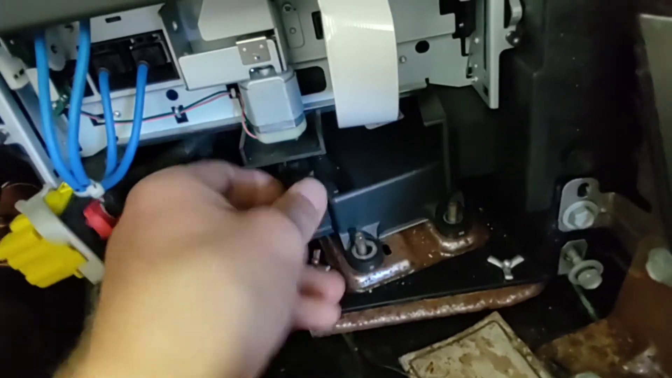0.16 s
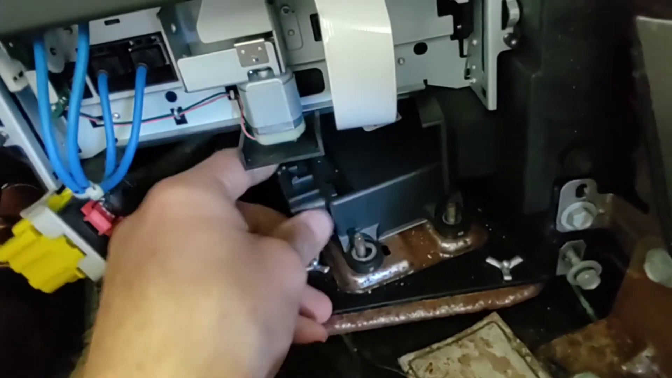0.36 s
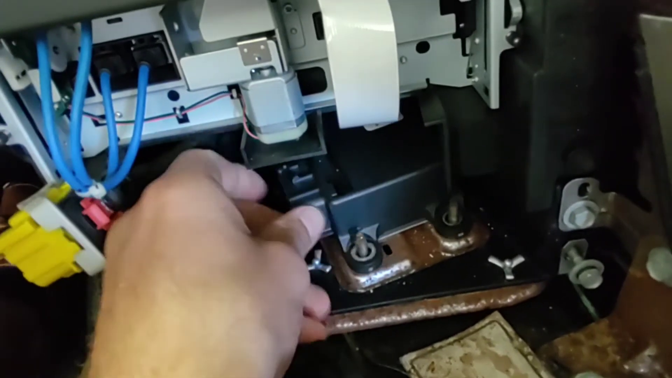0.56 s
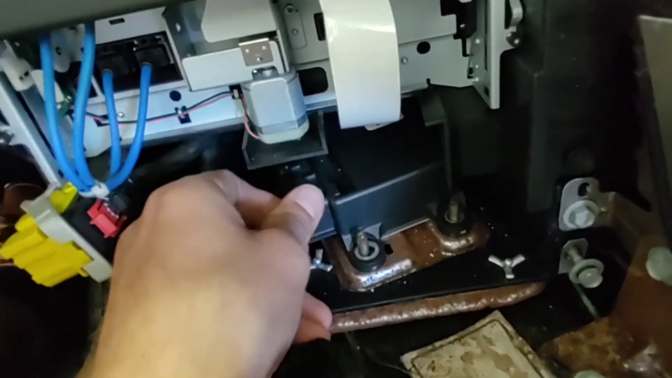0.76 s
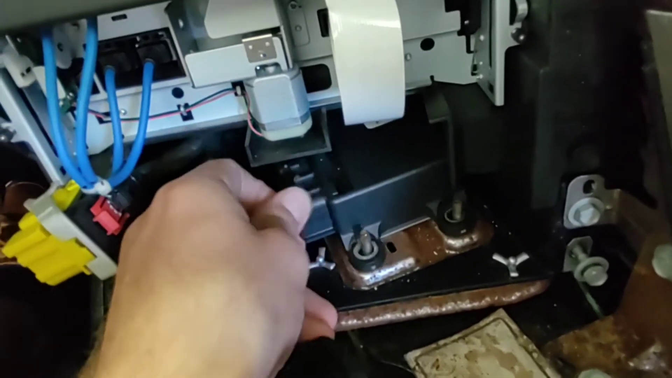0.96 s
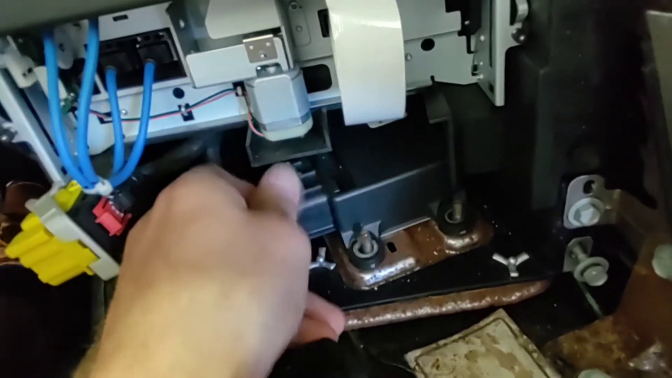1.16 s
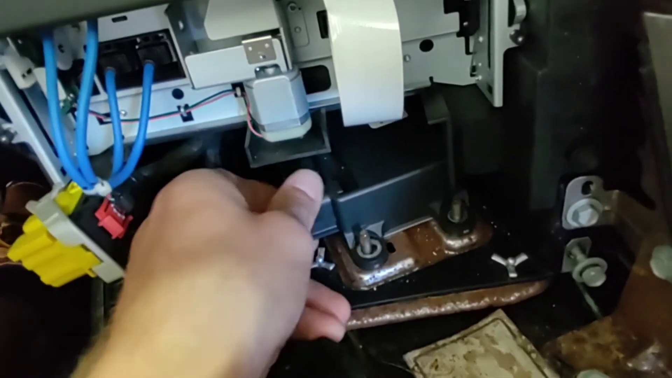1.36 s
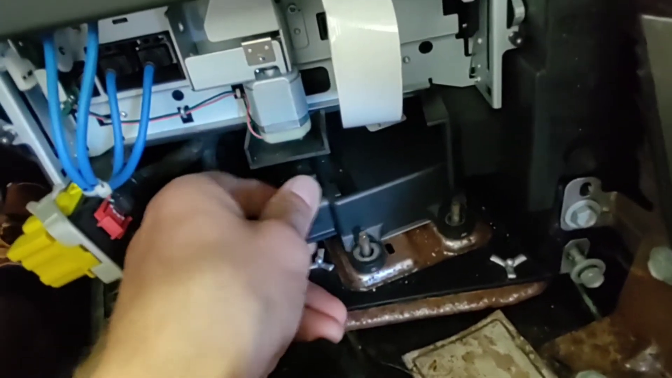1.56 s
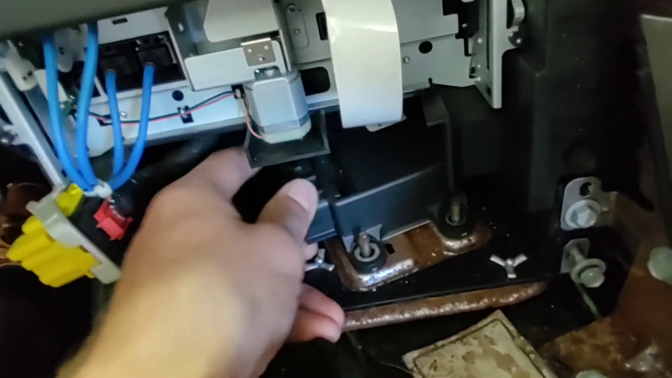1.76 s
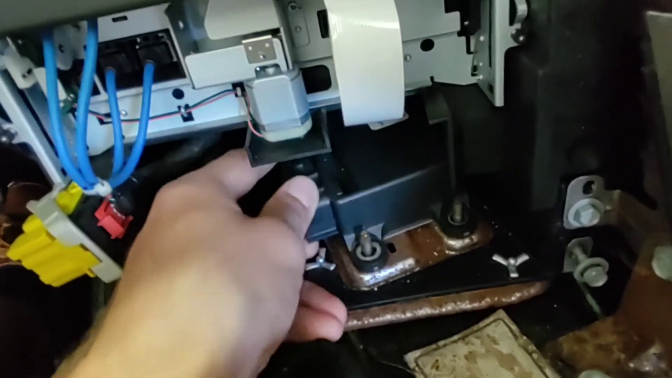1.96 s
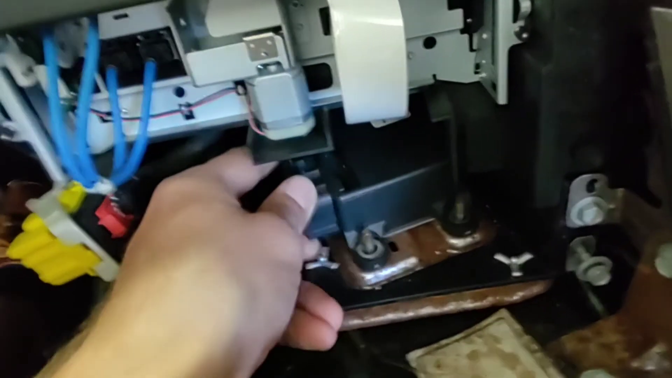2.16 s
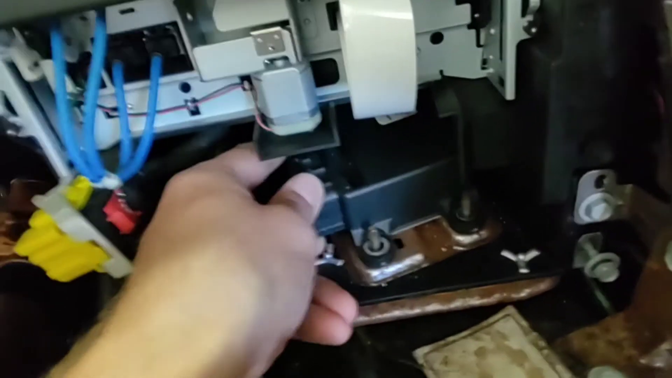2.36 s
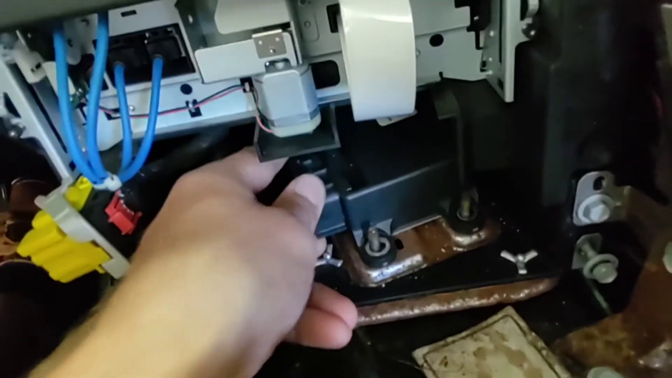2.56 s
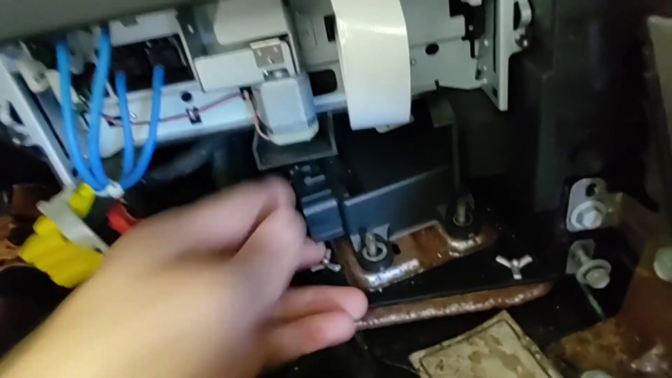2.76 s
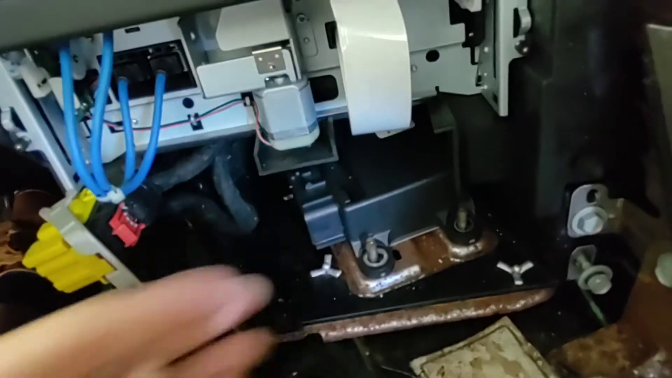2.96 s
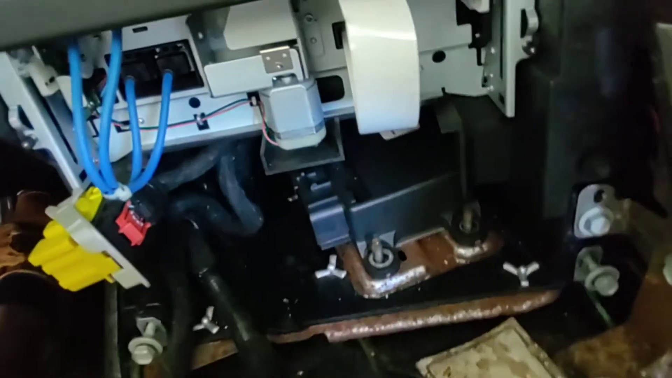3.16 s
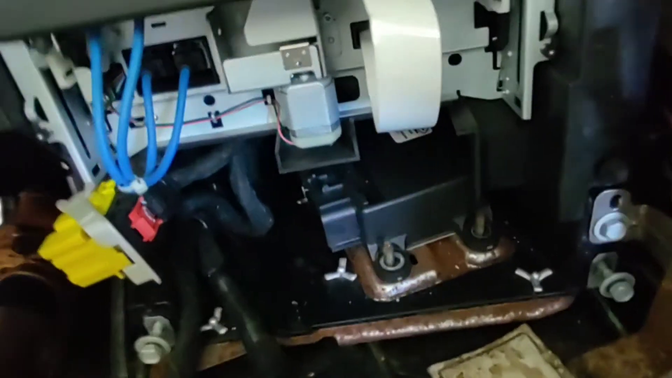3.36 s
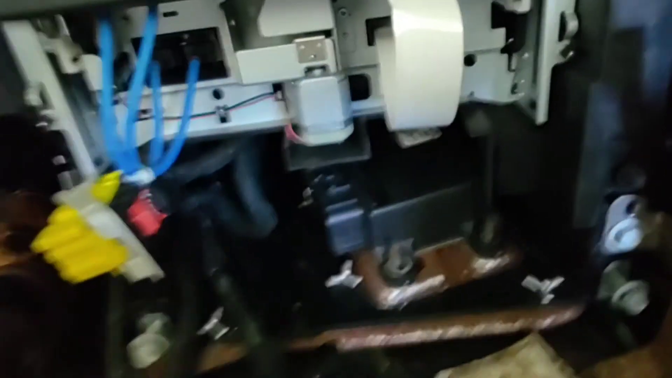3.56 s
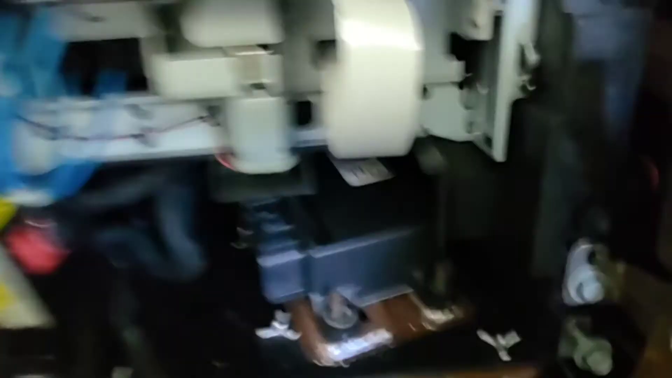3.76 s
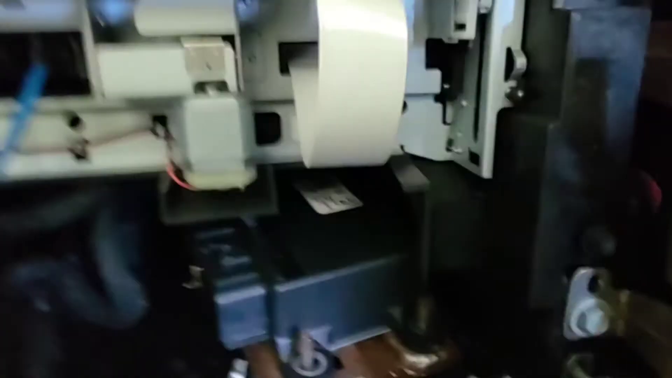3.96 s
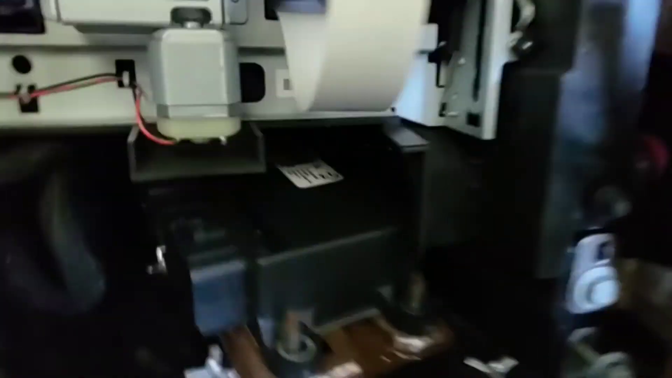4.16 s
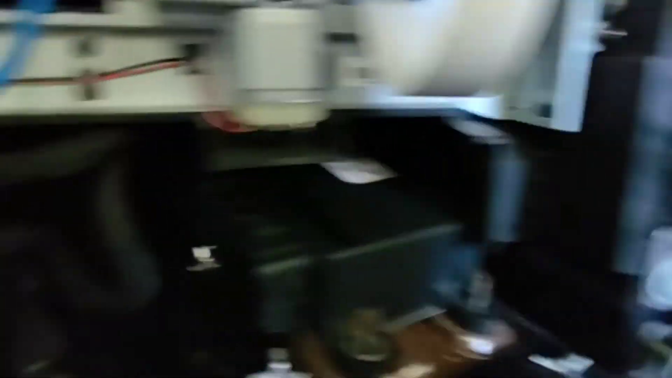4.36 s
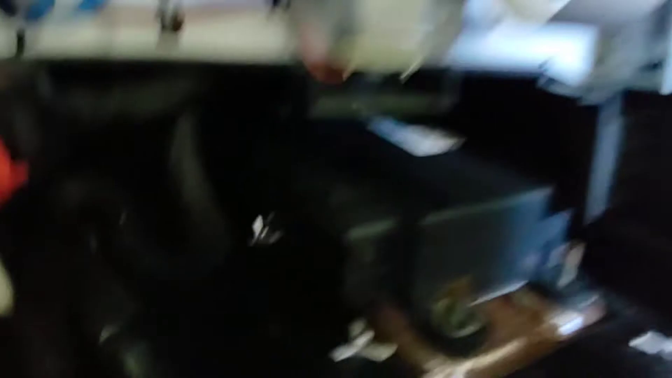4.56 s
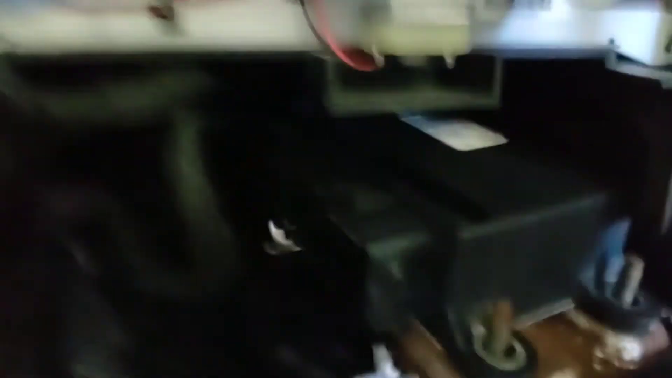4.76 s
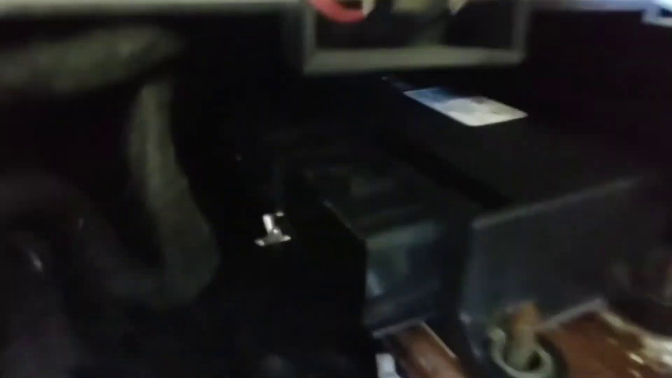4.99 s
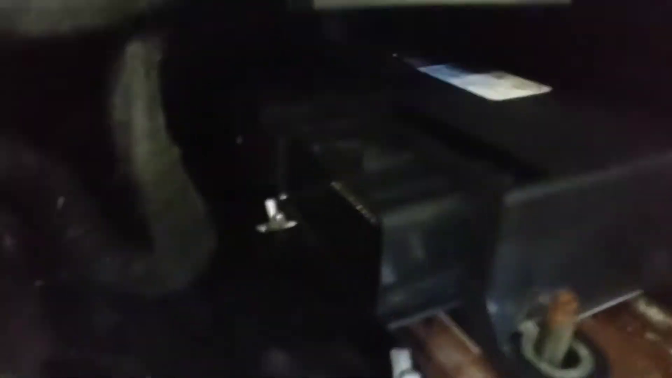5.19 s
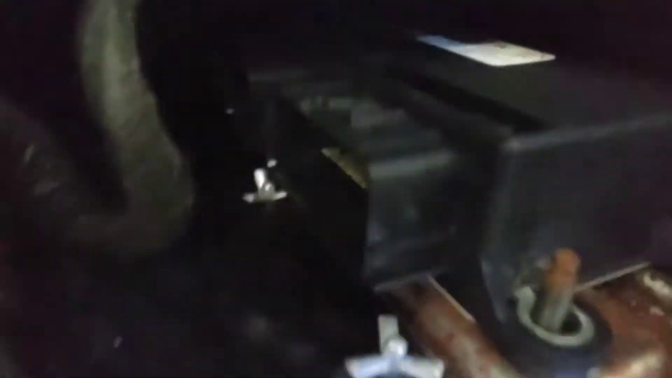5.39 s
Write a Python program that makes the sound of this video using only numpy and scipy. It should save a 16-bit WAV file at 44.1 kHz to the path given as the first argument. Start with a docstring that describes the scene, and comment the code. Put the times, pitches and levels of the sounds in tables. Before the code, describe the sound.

Irregular clacks and scrapes of plastic on metal, bunching into a fast rattle, give way to faint hiss and sharp taps on the camera.

```python
"""Module wiggled under a dashboard

A hand wiggles a plastic electronic module on its steel bracket, close to a handheld camera, in a dead, carpeted
footwell. Knocks are shaped noise plus ringing modes; scrapes are stick-slip grains; squeaks are narrow resonances.
Then the arm slides away with a soft hiss of filtered noise, and fingers bump and tick on the camera's body,
mostly at its right microphone port: short noise bursts, damped pushes and grainy crackle over a low, steady noise."""
import sys
import numpy as np
from scipy import signal
from scipy.fft import rfft, irfft
from scipy.io import wavfile

SR = 44100
rng = np.random.default_rng(int(sys.argv[2]) if len(sys.argv) > 2 else 0)


def int16_out(signal):
    """Quantize to a 16-bit WAV file."""
    q = np.round(np.clip(np.atleast_2d(signal).T, -1, 1) * 32767)
    wavfile.write(sys.argv[1], SR, q.astype(np.int16))


N = 239286

# Housing against bracket. Each row: start in seconds, strength in dB, hardness of the contact in dB,
# hollow clack of the shell in dB.
KNOCK_ROWS = [(0.0, -22.5, 2, 0), (0.0185, -16.5, -0.5, -2), (0.0554, -28, 0.5, 1), (0.2644, -47, 2.5, 0.5),
              (0.2988, -41, 6, -11), (0.3314, -38, -3, 4), (0.5148, -40.5, -1.5, 4.5),
              (0.6275, -50, -4.5, -3.5), (0.7441, -26.5, 5.5, -3), (0.9675, -51, -0.5, -3),
              (1.029, -15.5, 1, -8), (1.139, -40.5, -5, 6), (1.1746, -28.5, 0, 2), (1.229, -21.5, 1, -4),
              (1.247, -32.5, -.5, -1), (1.3079, -19, -1.5, -0.5), (1.318, -25.5, -2.5, 2),
              (1.3254, -30, 3, 1), (1.3979, -30.5, .5, 7.5), (1.4384, -21.5, 1, -2),
              (1.5541, -35.5, -7, 10), (1.5715, -25, -.5, -2), (1.673, -35.5, -3, 1), (1.714, -53, -5.5, 0),
              (1.8093, -25, 3, 0.5), (1.9131, -37.5, 1, 0.5), (2.0661, -27, 2.5, 2.5),
              (2.1314, -19.5, 3.5, 3.5), (2.1808, -33, -5.5, -3.5), (2.1965, -29, -2.5, -3.5),
              (2.2053, -20.5, 4, 1), (2.2218, -23, -3, 2), (2.2386, -20.5, -1, -8), (2.2695, -24, -6, 5.5),
              (2.287, -24, -6, -4), (2.3096, -21, 6.5, 1.5), (2.3195, -34.5, 10, -1.5),
              (2.3469, -19.5, 0.5, -2.5), (2.6621, -52.5, 6.5, -3), (2.7374, -54.5, -0.5, 4),
              (2.7896, -59.5, 0.5, -17.5), (2.8368, -66, 9, 9.5), (2.8962, -61, -2.5, -3)]
# Colour of a usual knock. Each entry: one band's level in dB, bass to treble.
KNOCK_COLOUR_DB = [-14, 0.5, -1.08, 1.2, -8.5]
# Growth with force, hardness and clack. Each row: one of these; columns: bass to treble in dB per dB.
KNOCK_GROWTH_DB_PER_DB = [(.42, 0.81, 1.04, 0.97, .94), (-1.1, -.8, 0.11, .7, 1),
                          (-0.5, -0.094, 1.1, 0.22, -.3)]
USUAL_KNOCK_DB = -30
KNOCK_T60_S = 0.035  # longest ring of the crack
FIRM_KNOCK_DB, PRESS_DAMPING_DB_PER_DB = -22, 0.35  # the crack shortens above this strength


def knock(start_s, strength_db, hardness_db, clack_db):
    """The housing hits the bracket: the thud grows slower than the crack, a firm press damps the crack."""
    force_db = strength_db - USUAL_KNOCK_DB
    growth_db = np.dot([force_db, hardness_db, clack_db], KNOCK_GROWTH_DB_PER_DB)
    levels_db = USUAL_KNOCK_DB + np.add(KNOCK_COLOUR_DB, growth_db)
    excess_db = max(strength_db - FIRM_KNOCK_DB, 0)
    t60_s = KNOCK_T60_S * amp(-PRESS_DAMPING_DB_PER_DB * excess_db)
    return start_s, blow(levels_db, contact_pan(start_s), t60_s, modes_db=0.5, tail_db=0, snap_db=-11.0,
                         rise_s=0.0013, dull_hz=8900)


# Place of contact as the module rocks. Each row: time in seconds, left-right in dB.
CONTACT_PAN_ROWS = [(.05, -4.5), (.27, 0.5), (1.45, 0), (2.07, -2), (2.22, 6), (2.285, 5.5), (2.31, 5),
                    (2.39, 5), (2.55, 0.5)]


def contact_pan(time_s):
    """Left-right dB of the place where the housing touches at that moment."""
    return np.interp(time_s, *np.transpose(CONTACT_PAN_ROWS))


# Shading between the ports. Each entry: one band's left-right in dB, bass to treble.
PORT_PAN_DB = [2, -0.5, 0, -5.5, -7]
# Correlation of the noise at the ports. Each entry: one band's likeness from 0 to 1, bass to treble.
PORT_CORRELATION = [1, .88, 0.24, 0.067, 0.077]
# Tail of dashboard and footwell. Each entry: one band's t60 in seconds, bass to treble.
TAIL_T60_S = [0.25, 0.11, 0.1, .13, 0.082]
# Start of that tail relative to the crack, before the blow's own offset. Each entry: one band in dB.
TAIL_START_DB = [-9.5, -12, -5.5, -18.5, -25]
USUAL_BOUNCE_S, BOUNCE_DB = .0026, -7.5  # rebound; its delay varies from half to one and a half


def blow(levels_db, pan_db, t60_s, modes_db, tail_db, snap_db, rise_s, dull_hz):
    """A contact: a snap with one rebound, a dense crack, the housing's modes and a tail, weighted by band."""
    t = np.arange(SR // 4) / SR
    head = slice(0, round(.012 * SR))  # sets the level
    rise = 1 - np.exp(-(t / rise_s) ** 2)  # the edges take a moment to bite
    ring = housing(t, damping=1.9) * rise
    snap = signal.unit_impulse(len(t), int(np.searchsorted(t, rise_s)))  # then meet squarely
    bounce_s = USUAL_BOUNCE_S * (.5 + rng.random())
    snap[np.searchsorted(t, rise_s + bounce_s)] += amp(BOUNCE_DB)
    out = np.zeros((2, len(t)))
    for k, level_db in enumerate(levels_db):
        tail = amp(TAIL_START_DB[k] + tail_db - 60 * t / TAIL_T60_S[k])
        fade = amp(-60 * t / t60_s) + tail
        noise = pair(len(t), PORT_CORRELATION[k])
        crack = dulled(band(noise * fade * rise, k), dull_hz)
        click = dulled(band(snap, k), dull_hz)
        part = unit(crack) + amp(snap_db) * unit(click) + amp(modes_db) * unit(band(ring, k))
        part /= part[:, head].std(axis=1, keepdims=True)
        out += amp(level_db) * panned(pan_db + PORT_PAN_DB[k]) * part
    return out


# Modes of housing and bracket. Each row: mean frequency in Hz, median level in dB,
# t60 in seconds at damping 1, left-right in dB.
HOUSING_MODES = [(198, -14, 0.096, 0), (277.7, -0.5, 0.19, -3), (407, -18, 0.092, 5), (525.7, 0, 0.15, 6.5),
                 (574, 8, 0.086, -6.5), (824, -4.5, 0.16, 11), (860, 0.5, 0.088, -2.5),
                 (1206, 2.5, 0.12, -5), (1452, -1, 0.067, -4.5), (1576, -11, 0.18, 13),
                 (2110, -24, 0.056, -6), (2365, 3.5, 0.1, 3), (2740, 9.5, 0.015, -5),
                 (3165, 6, 0.075, -6.5), (3465, 6, 0.03, -14), (3720, -17.5, 0.023, -3),
                 (5415, -5.5, 0.071, -1.5), (6925, -1, 0.061, 3.5), (7450, -3.5, 0.029, 17.5)]


def housing(t, damping):
    """The modes ring, each as strongly as the point of contact happens to move it."""
    out = np.zeros((2, len(t)))
    for hz, level_db, t60_s, pan_db in HOUSING_MODES:
        strength, detune, skew = rng.standard_normal(3)
        port_skew = np.array([[0], [skew * hz / 1500]])  # high modes reach the ports out of step
        phase = 2 * np.pi * rng.random() + port_skew
        mode_hz = hz * (1 + 0.043 * detune)  # the hand's pressure shifts the pitch
        swing = np.sin(2 * np.pi * mode_hz * t + phase)
        decay = amp(level_db + 4.1 * strength - 60 * t * damping / t60_s)
        out += panned(pan_db) * decay * swing
    return out


SKID_AHEAD_S, SKID_LENGTH_S, USUAL_SKID_DB, SKID_HARDNESS_DB = 0.0074, .02, -54, 2
SKID_DB_PER_FORCE_DB, SKID_DB_PER_HARDNESS_DB = .5, .3


def lead_in(start_s, strength_db, hardness_db, clack_db):
    """Before it strikes, the housing skids briefly along the bracket, harder before a harder knock."""
    skid_db = USUAL_SKID_DB + SKID_DB_PER_FORCE_DB * (strength_db - USUAL_KNOCK_DB)
    skid_db += SKID_DB_PER_HARDNESS_DB * hardness_db
    return scuff(start_s - SKID_AHEAD_S, SKID_LENGTH_S, skid_db, SKID_HARDNESS_DB)


# Short slips of one surface on another. Each row: centre in seconds, nominal length in seconds,
# strength in dB, hardness in dB.
SCUFF_ROWS = [(0.035, .026, -33.5, -5), (0.24, 0.038, -55.5, -2.5), (0.303, 0.071, -51, -8),
              (0.392, 0.1, -63.5, 11), (0.499, 0.024, -58.5, 4), (0.599, 0.015, -53, 11.5),
              (0.66, 0.013, -66, 13), (1.164, .025, -48.5, -1.5), (1.376, 0.022, -41, -2),
              (1.516, 0.065, -51.5, 0.5), (1.945, 0.029, -44.5, -0.5), (2.031, 0.036, -38, -2.5),
              (2.147, 0.023, -35, -3), (2.265, 0.03, -33, -4), (2.376, 0.043, -40, -3),
              (2.567, 0.036, -50.5, -2.5)]
# Colour of a usual scuff. Each entry: one band's level in dB, bass to treble.
SCUFF_COLOUR_DB = [-12.5, 1.2, -0.2, 1.5, 3.1]
# Growth with hardness. Each entry: one band in dB per dB, bass to treble.
SCUFF_GROWTH_DB_PER_DB = [-1.2, -1, 0.14, .5, 1]


def scuff(centre_s, length_s, strength_db, hardness_db):
    """A swell of stick-slip grains that shakes the housing."""
    growth_db = np.multiply(hardness_db, SCUFF_GROWTH_DB_PER_DB)
    levels_db = strength_db + np.add(SCUFF_COLOUR_DB, growth_db)
    pan_db = contact_pan(centre_s)
    t = np.arange(round((2 * length_s + 0.052) * SR)) / SR
    swell = np.exp(-2 * ((t - length_s) / length_s * 1.51) ** 2)
    stroke = grains(len(t), per_s=2800, spread_db=5.5) * swell
    ring = housing(t, damping=4.5)
    middle = slice(round(length_s * SR * 3 / 4), round(length_s * SR * 5 / 4))  # sets the level
    out = np.zeros((2, len(t)))
    for k, level_db in enumerate(levels_db):
        noise = pair(len(t), PORT_CORRELATION[k]) * amp(-60 * t / 0.044)
        body = unit(band(noise, k)) + amp(-2) * unit(band(ring, k))
        part = signal.fftconvolve(stroke[None], body, axes=1)[:, :len(t)]
        out += amp(level_db) * panned(pan_db + PORT_PAN_DB[k]) * part / part[:, middle].std()
    return centre_s - length_s, dulled(out, hz=7800)


# An edge dragging on the bracket. Each row: centre in seconds, half-length to 1/e in seconds,
# gain in dB, pitch as a multiple of the resonances below.
SQUEAK_ROWS = [(0.597, 0.007, -46, 1), (0.61, 0.012, -45, .92), (0.888, 0.016, -72, 1),
               (1.063, 0.011, -40.5, 1), (2.663, 0.0057, -58, 1), (3.687, 0.0033, -68.5, 1.06)]
# Resonances at pitch 1. Each row: frequency in Hz, width of one filter pass in Hz, level in dB.
SQUEAK_RESONANCES = [(3213, 170, 6), (6860, 1490, -4.5), (8200, 1200, -4)]


def squeak(centre_s, half_length_s, gain_db, pitch):
    """A brief drag that sings in the bracket's narrow resonances."""
    t = np.arange(-SR // 10, SR // 10) / SR
    drag = pair(len(t), 1.0)
    ring = np.zeros_like(drag)
    for hz, width_hz, mode_db in SQUEAK_RESONANCES:
        b, a = signal.iirpeak(hz * pitch, hz / width_hz, SR)
        once = signal.lfilter(b, a, drag)
        ring += amp(mode_db) * unit(signal.lfilter(b, a, once))
    swell = np.exp(-(t / half_length_s) ** 2)
    return centre_s + t[0], amp(gain_db) * panned(-9.5) * ring * swell


# Pushes of the hand that make the parts rub. Each row: start in seconds, length in seconds, level in dB.
RUB_STROKES = [(0.02, 0.06, -42), (.26, 0.12, -50), (.56, 0.26, -60), (1.02, 0.11, -52.5),
               (1.22, 0.1, -46.5), (1.42, 0.12, -47.5), (1.72, .26, -61.5), (2.09, 0.34, -45),
               (2.2, 0.053, -37), (2.66, 0.38, -65)]
# Spectrum of the rub. Each row: frequency in Hz, relative level in dB.
RUB_SPECTRUM = [(30, -28), (70, -7), (150, 1.5), (300, 0), (550, -1), (1100, -6), (1900, -12), (2400, -8),
                (3200, -8), (4700, -21), (7000, -23), (12000, -42)]


def rubbing():
    """Low, grainy friction of the hand and the parts between the knocks."""
    friction = pair(N, 0.95) + amp(-3.5) * grains(N, per_s=660, spread_db=6.0)
    gain = strokes(RUB_STROKES, rise_s=0.049, fade_s=0.037)
    return gain * panned(-2) * coloured(friction, RUB_SPECTRUM)


# Strokes of skin and cloth. Each row: start in seconds, length in seconds, level in dB.
SLIDE_STROKES = [(0.0, 2.5, -69), (.14, 0.26, -59.5), (.26, 0.028, -55), (.66, 0.13, -66),
                 (1.46, 0.048, -51), (2.69, 0.3, -58), (2.9, 0.037, -51), (3.0, 0.076, -51),
                 (3.15, 0.198, -70), (3.385, 0.04, -53), (3.46, 0.059, -47), (3.56, 0.24, -61),
                 (3.8, .28, -66.5), (4.745, 0.034, -57), (4.98, 0.48, -67)]
# Spectrum of the slide. Each row: frequency in Hz, relative level in dB.
SLIDE_SPECTRUM = [(900, -33), (2300, -18), (4200, -14), (6000, -8), (9000, -5.5), (11700, -4), (13500, -5),
                  (15500, -8)]
# Place of the slide. Each row: time in seconds, left-right in dB.
SLIDE_PAN_ROWS = [(0, -10.5), (2.599, -7), (2.95, -10.5), (3.55, -4.5), (4.3, -21), (4.75, -17),
                  (5.43, -11)]


def sliding():
    """Fine, smooth hiss of skin and cloth sliding close to the microphone."""
    pan_db = np.interp(np.arange(N) / SR, *np.transpose(SLIDE_PAN_ROWS))
    gain = strokes(SLIDE_STROKES, rise_s=.022, fade_s=.04)
    return gain * panned(pan_db) * coloured(pair(N, .15), SLIDE_SPECTRUM)


# Fingers on the camera's body. Each row: start in seconds, strength in dB, hardness in dB, clack in dB,
# t60 of the crack in seconds.
TICK_ROWS = [(3.1093, -74, 7, -9.5, .012), (3.138, -70, -4, -8, 0.019), (3.382, -74.5, -2, 6, 0.019),
             (3.435, -73, -4, 3, .02), (3.6577, -72, -9, -11, 0.022), (3.7448, -63, -6.5, -7.5, 0.014),
             (3.9947, -63.5, 2, -1.5, 0.024), (4.1161, -67, 4.5, -2, 0.019), (4.233, -73, 5.5, -5, 0.024),
             (4.485, -79.5, 1, 5, 0.016), (4.655, -53.5, -12.5, 3, 0.025), (4.696, -50.5, -8, 3, 0.026),
             (4.7038, -54, 0, 3, .02), (4.825, -43, 7, 4.5, 0.021), (4.8324, -39.5, 3, 2, 0.065),
             (4.8938, -67.5, -7, -1, 0.025), (4.9587, -61.5, 7.5, 5.5, 0.082),
             (4.9695, -56.5, 4, 9.5, 0.025), (4.983, -69, 5, 9, 0.015), (4.998, -60, 4.5, 1.5, 0.087)]
# Colour of a usual touch. Each entry: one band's level in dB, bass to treble.
TICK_COLOUR_DB = [2.5, 0, 0, -3, -1]
# Growth with hardness and clack. Each row: one of these; columns: bass to treble in dB per dB.
TICK_GROWTH_DB_PER_DB = [(-0.92, -0.85, 0.037, 0.88, 0.55), (-0.12, 0.18, 0.79, 0.97, -0.85)]
USUAL_TICK_PAN_DB, TICK_PAN_DB_PER_HARDNESS_DB = -21, 0.95


def camera_tick(start_s, strength_db, hardness_db, clack_db, t60_s):
    """A finger meets the camera's body; the softer the touch, the more it stays in the right port."""
    growth_db = np.dot([hardness_db, clack_db], TICK_GROWTH_DB_PER_DB)
    levels_db = strength_db + np.add(TICK_COLOUR_DB, growth_db)
    pan_db = USUAL_TICK_PAN_DB + TICK_PAN_DB_PER_HARDNESS_DB * hardness_db
    return start_s, blow(levels_db, pan_db, t60_s, modes_db=-40, tail_db=-15.0, snap_db=-2.5,
                         rise_s=0.00056, dull_hz=13570)


# Soft fingertips and a hard nail landing at the right port. Each row: crest time in seconds,
# peak in dB, frequency in Hz, half-length to 1/e in seconds.
THUMP_ROWS = [(4.003, -41, 75, 0.0064), (4.661, -13.5, 100, 0.0036), (4.705, -13.5, 115, 0.0025),
              (4.8265, -6.5, 1470, 0.00023), (4.898, -31, 171, 0.0016), (5.001, -33.5, 178, 0.0046)]


def thump(crest_s, peak_db, hz, half_length_s):
    """A push on the camera's body with a sharp crest, nearly all in the right port."""
    t = np.arange(-SR // 25, SR // 25) / SR
    push = -np.cos(2 * np.pi * hz * t) * np.exp(-abs(t) / half_length_s)
    return crest_s + t[0], amp(peak_db) * amp([[-32], [0]]) * push


# Fingers shifting their grip. Each row: start in seconds, length in seconds, gain in dB.
GRIP_STROKES = [(3.2, 0.68, -71), (3.88, 0.055, -60), (3.98, 0.052, -62), (4.1, 0.022, -69),
                (4.65, .06, -66), (4.83, .12, -64), (5.0, 0.19, -72.5), (5.22, 0.022, -61.5),
                (5.34, 0.023, -64.5)]
# Spectrum of the grip. Each row: frequency in Hz, relative level in dB.
GRIP_SPECTRUM = [(40, -6.5), (130, 3.5), (300, -0.5), (800, -7.5), (2500, -10.5), (6000, -15),
                 (15000, -26.5)]


def gripping():
    """Faint crackle of skin slipping on the camera's body."""
    slips = grains(N, per_s=1200, spread_db=5.5) + amp(2.5) * pair(N, 0.16)
    gain = strokes(GRIP_STROKES, rise_s=0.018, fade_s=0.028)
    return gain * panned(-10.0) * coloured(slips, GRIP_SPECTRUM)


# Spectrum of the background. Each row: frequency in Hz, relative density in dB.
QUIET_SPECTRUM = [(15, -44), (25, -19.5), (37, -12.5), (59, -3.5), (82, -10), (599, -25.5), (667, -32.5),
                  (973, -33.5), (1960, -28.5), (10100, -33), (15600, -44)]
QUIET_DB = -73


def quiet_background():
    """Steady noise, mostly low, under everything."""
    return amp(QUIET_DB) * panned(-2.5) * coloured(pair(N, .1), QUIET_SPECTRUM)


def strokes(rows, rise_s, fade_s):
    """Gain at every sample: each stroke swells, holds and dies away; overlapping powers add."""
    t = np.arange(N) / SR
    power = np.zeros(N)
    for start_s, length_s, level_db in rows:
        early_s = np.maximum(start_s - t, 0)
        late_s = np.maximum(t - start_s - length_s, 0)
        power += (amp(level_db) * np.exp(-early_s / rise_s - late_s / fade_s)) ** 2
    return np.sqrt(power)


def grains(size, per_s, spread_db):
    """Tiny slips at random moments, a few much larger than the rest, at rms 1."""
    sizes = amp(spread_db * np.minimum(rng.exponential(1, size), 4)) * rng.choice([-1, 1], size)
    return unit(sizes * (rng.random(size) < per_s / SR))


def pair(size, likeness):
    """White noise at two microphone ports, partly the same."""
    left, other = rng.standard_normal((2, size))
    c = np.clip(likeness, -1, 1)
    return np.array([left, c * left + np.sqrt(1 - c ** 2) * other])


# Limits of the five bands: bass, low-mid, mid, presence, treble. Each entry: one edge in Hz.
BAND_EDGES_HZ = [120, 380, 900, 2000, 4500, 15000]


def band(x, index):
    """One of the five bands, filtered causally."""
    sos = signal.butter(5, BAND_EDGES_HZ[index:index + 2], "bandpass", fs=SR, output="sos")
    return signal.sosfilt(sos, x)


def coloured(x, points):
    """Gives a long noise the spectrum (Hz, dB), at rms 1."""
    hz, db = np.transpose(points)
    bins_hz = np.fft.rfftfreq(N, 1 / SR)
    gain = amp(np.interp(np.log(bins_hz + 1), np.log(hz), db))
    return unit(irfft(rfft(x) * gain, N))


def dulled(x, hz):
    """Plastic yields a little, so its contacts carry few of the highest frequencies."""
    return signal.sosfilt(signal.butter(3, min(hz, SR / 2 - 100), fs=SR, output="sos"), x)


def panned(pan_db):
    """Left and right gains of constant power."""
    gains = amp(np.array([pan_db, -pan_db]).reshape(2, -1) / 2)
    return gains / np.sqrt(np.mean(gains ** 2, axis=0))


def amp(db):
    """Amplitude ratio of a level in dB."""
    return 10 ** (np.asarray(db) / 20)


def unit(x):
    """Scales a sound to rms 1."""
    return x / np.sqrt(np.mean(x ** 2) + 1e-20)


def add(mix, start_s, sound):
    """Lays a stereo sound into the mix, no earlier than its beginning."""
    part = mix[:, max(round(start_s * SR), 0):][:, :sound.shape[1]]
    part += sound[:, :part.shape[1]]


def scene():
    """Sums the continuous layers and every single contact."""
    mix = rubbing() + sliding() + gripping() + quiet_background()
    for source, rows in ((knock, KNOCK_ROWS), (lead_in, KNOCK_ROWS), (scuff, SCUFF_ROWS),
                         (squeak, SQUEAK_ROWS), (camera_tick, TICK_ROWS), (thump, THUMP_ROWS)):
        for row in rows:
            add(mix, *source(*row))
    return mix


LOW_CUT_HZ, HIGH_CUT_HZ = 52, 15800


def record(dry):
    """The microphone drops the deepest bass and rounds off the highest peaks; then the band limit."""
    low_cut = signal.butter(2, LOW_CUT_HZ, "highpass", fs=SR, output="sos")
    x = signal.sosfilt(low_cut, dry)
    rounded = x / (1 + x ** 6) ** (1 / 6)
    band_limit = signal.firwin(401, HIGH_CUT_HZ, window=("kaiser", 9), fs=SR)
    return signal.oaconvolve(rounded, band_limit[None], "same")


dry = scene()
out = record(dry)
int16_out(out)
```